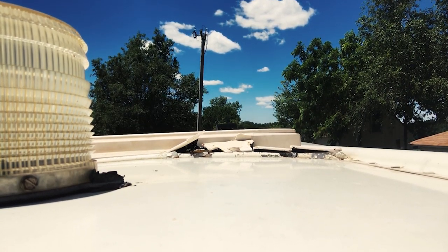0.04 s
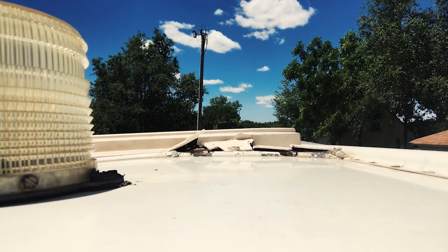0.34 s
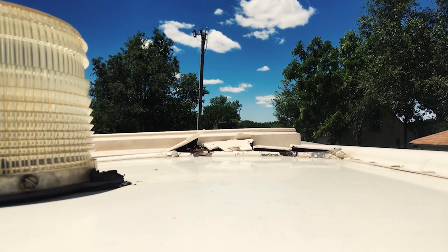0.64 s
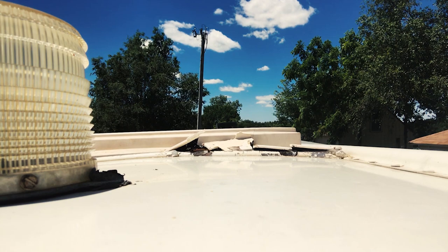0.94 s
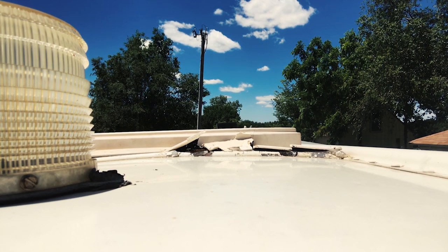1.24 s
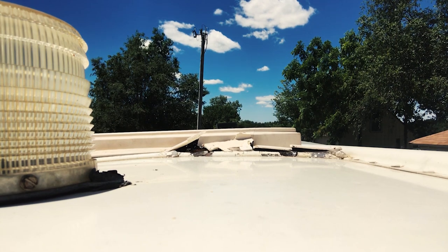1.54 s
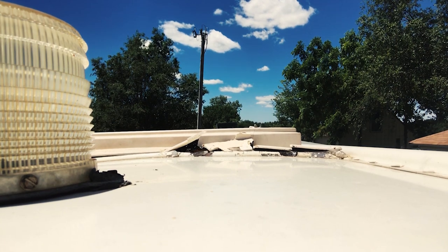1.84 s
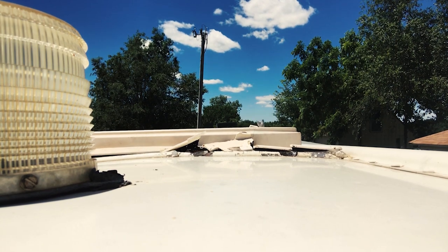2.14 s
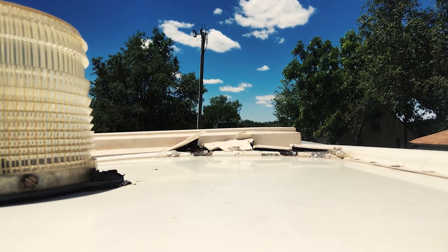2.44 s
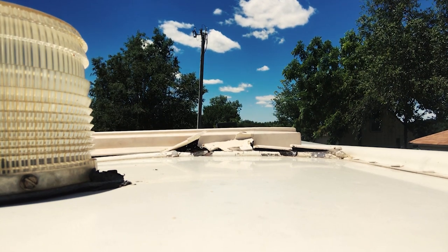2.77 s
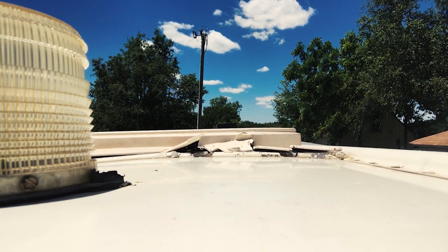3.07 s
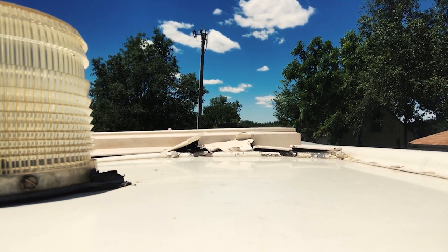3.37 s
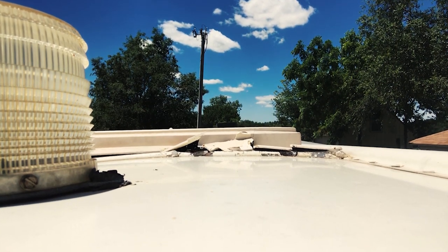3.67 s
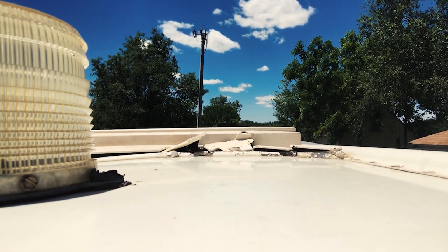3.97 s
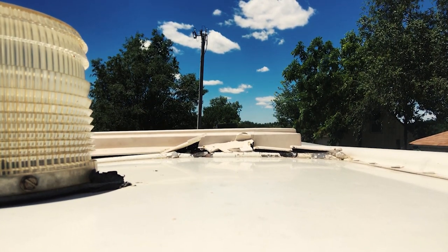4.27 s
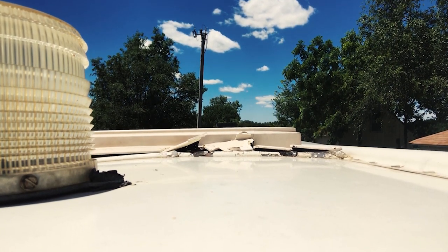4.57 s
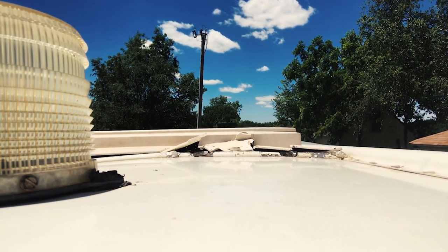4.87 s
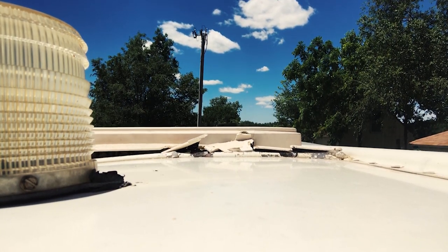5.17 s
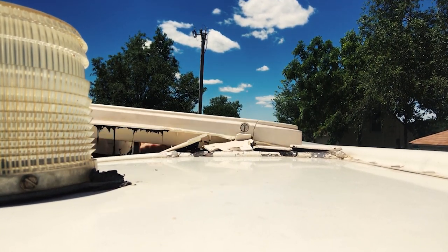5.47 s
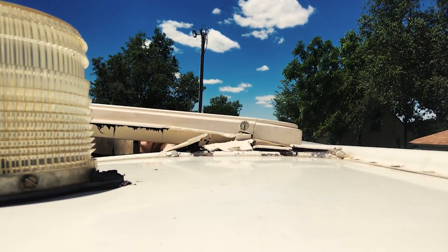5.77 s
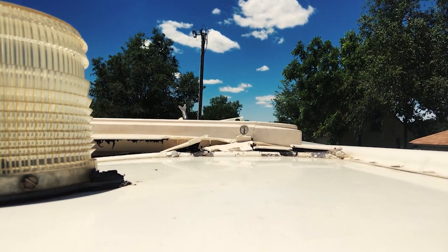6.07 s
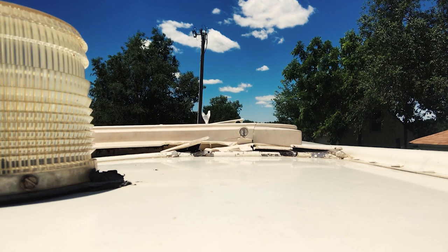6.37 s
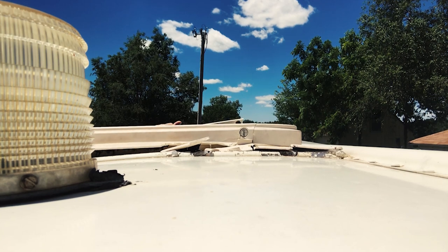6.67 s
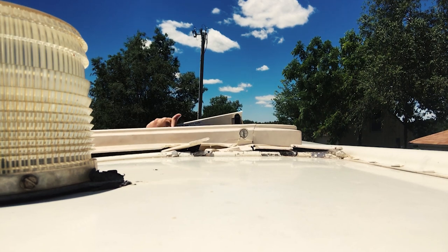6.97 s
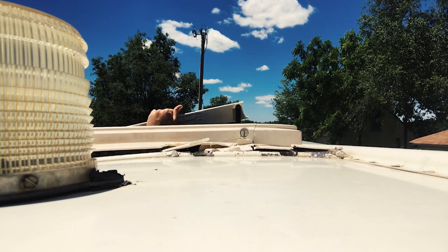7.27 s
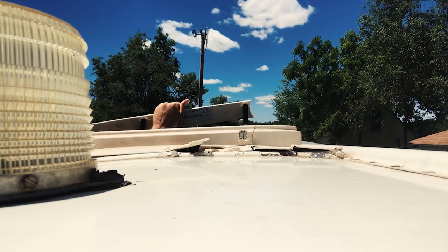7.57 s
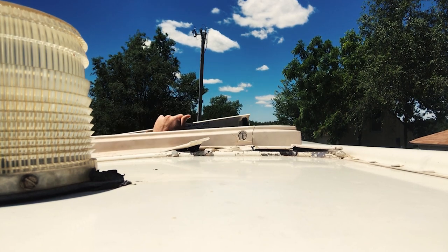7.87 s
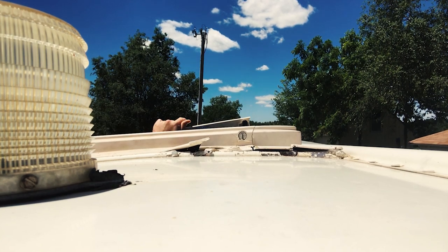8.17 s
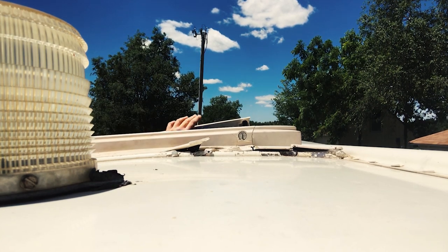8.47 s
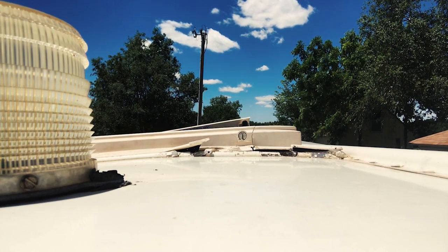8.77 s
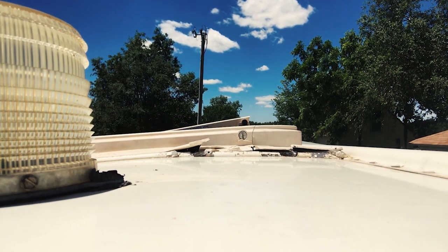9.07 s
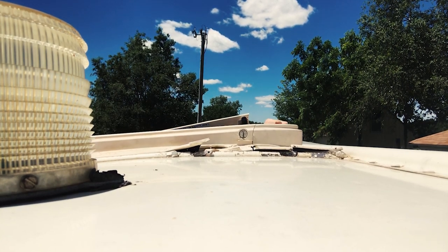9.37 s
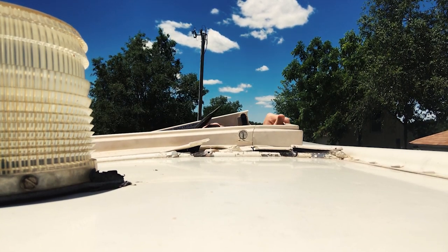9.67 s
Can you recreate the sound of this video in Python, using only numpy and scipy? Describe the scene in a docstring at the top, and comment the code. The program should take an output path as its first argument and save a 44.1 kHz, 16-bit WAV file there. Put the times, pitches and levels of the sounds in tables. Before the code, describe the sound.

Close plastic cracking, knocking and scraping on a flexing sheet-metal roof outdoors, with a repeating bird chirp and light wind.

```python
"""Outdoors on a sheet-metal roof, on a calm day, a brittle plastic hatch frame is pried off close by.
The plastic cracks, knocks and scrapes, loose chips tick, and the roof flexes and booms under it.
A loose screw clinks, and a metal tool rings as it is put down. Behind the work, a bird repeats
a two-note chirp, others call far off, the trees hush and a gust buffets the microphone."""
import sys
import numpy as np
from scipy import signal
from scipy.fft import rfft, irfft, next_fast_len
from scipy.io import wavfile
from scipy.ndimage import uniform_filter1d

SR = 44100
rng = np.random.default_rng(int(sys.argv[2]) if len(sys.argv) > 2 else 0)


def master(y):
    """Save y as 16-bit WAV."""
    cut = np.clip(np.atleast_2d(y).T, -1, 1)
    pcm = np.round(cut * 32767)  # scale
    wavfile.write(sys.argv[1], SR, pcm.astype(np.int16))


N = 437913

# the plastic breaks: (time [s], level [dB], treble snap [dB])
CRACKS = [(.357, -17.5, -23), (.677, -24, -8.5), (.705, -17.5, -11.5), (.7414, -31, -9), (.779, -12.5, -17),
          (0.9291, -11, -17.5), (.95, -12, -17.5), (.958, -16.5, -24.5), (1.142, -19.5, -16),
          (1.201, -19.5, -14.5), (1.373, -26, -17), (1.4126, -16.5, -7), (1.462, -29.5, -11),
          (2.412, -32.5, -15), (3.8563, -32, -17), (5.666, -21, -20), (5.825, -25, -17),
          (6.597, -21.5, -26), (7.03, -30, -22.5), (7.158, -32.5, -15.5), (7.234, -31, -25.5),
          (7.485, -32, -14.5), (7.537, -25.5, -25.5), (7.597, -17.5, -8), (7.735, -33, -20),
          (7.8392, -18.5, -22.5), (8.637, -26, -18.5), (9.7153, -12, -12.5), (9.8217, -35.5, -8),
          (9.8862, -28.5, -17.5)]
# the frame hits the roof: (time [s], level [dB], hollow clack [dB], roof boom [dB])
KNOCKS = [(.003, -42.5, 4, -27), (.062, -32.5, 8, -21.5), (.351, -18, 15.5, -18.5), (2.457, -22.5, 4, -22),
          (3.1677, -24, 7.5, -24.5), (3.319, -25.5, 9, -29.5), (3.612, -27, -1, -52), (3.704, -29, 18, -37),
          (4.359, -27, -4, -37), (4.534, -22.5, 1, -32), (4.685, -29, 4, -33.5), (4.94, -32.5, 8.5, -37.5),
          (5.081, -29, -1, -32), (5.227, -26.5, 0, -32), (5.655, -15.5, 3.5, -26), (5.775, -33, -1, -27.5),
          (5.928, -27, 3.5, -28), (6.5957, -28, -4, -29), (7.079, -32, 17, -32.5), (7.609, -16.5, -6, -15),
          (8.16, -31.5, 1, -29), (8.581, -32, 3, -13), (8.636, -20, 7, -42)]
# hands shift the loose frame: (start [s], end [s], level [dB])
HANDLING = [(0.456, 0.636, -44.5), (2.05, 2.951, -56), (6.207, 6.92, -46), (6.945, 7.404, -44),
            (7.869, 8.146, -38), (9.401, 9.685, -54)]
# pitches at which the frame rings: (pitch [Hz], width [Hz], boost [dB])
FRAME_RESONANCES = [(586, 290, 5), (890, 85, -2.5), (2111, 220, 4), (2516, 230, 1), (2980, 60, 5),
                    (3800, 600, 5.5), (5230, 97, 9), (6490, 233, 6), (10350, 460, -9)]
KNOCK_SNAP_DB, CRACK_SNAP_DB = -34.5, -14.5  # treble of a dull knock and of a typical crack


def amp(db):
    """Turns decibels into a gain."""
    return 10 ** (np.asarray(db) / 20)


def evened(x):
    """Scales a sound to an average (rms) strength of 1."""
    return x / np.sqrt(np.mean(x ** 2) + 1e-20)


def at_level(x, db, seconds):
    """Scales a sound so that its opening seconds have the level db."""
    return amp(db) * x / np.sqrt(np.mean(x[:int(seconds * SR)] ** 2) + 1e-20)


def add(mix, s, sound):
    """Mixes a sound in at s seconds."""
    part = mix[max(round(s * SR), 0):][:len(sound)]
    part += sound[:len(part)]


def drift(count):
    """A line wandering through count random values across the scene."""
    return np.interp(np.arange(N), np.linspace(0, N, count), rng.standard_normal(count))


def colour(x, tone, resonances=()):
    """Filters a sound by a tone curve (pitch [Hz], level [dB]) plus resonant peaks."""
    size = next_fast_len(len(x) + 4096)
    hz = abs(np.fft.fftfreq(size, 1 / SR))
    tone_hz, tone_db = np.transpose(tone)
    curve_db = np.interp(np.log(hz + 1), np.log(tone_hz + 1), tone_db)
    peaks_db = sum(db / (1 + (2 * (hz - f) / width) ** 2) for f, width, db in resonances)
    log_gain = np.log(amp(curve_db + peaks_db))
    response = np.exp(np.conj(signal.hilbert(log_gain)))  # rings after a hit, not before
    return irfft(rfft(x, size) * response[:size // 2 + 1], size)[:len(x)]


def dying(t, t60):
    """Fading noise, like many tones struck at once; t60 is the seconds taken to fall 60 dB."""
    return rng.standard_normal(len(t)) * amp(-60 * t / t60)


def struck(hits, tones):
    """A struck object rings with the same fading tones at every hit."""
    out, t = np.zeros(N), np.arange(3 * SR // 2) / SR
    ring = sum(amp(db - 60 * t / t60) * np.sin(2 * np.pi * hz * t) for hz, db, t60 in tones)
    for s, db in hits:
        add(out, s, amp(db) * ring)
    return out


def echoes(x, t60, rise_s, tone):
    """Scattered sound blurs into a tail that builds up and dies."""
    t = np.arange(SR) / SR
    tail = dying(t, t60) * (1 - np.exp(-t / rise_s))
    return signal.oaconvolve(x, colour(tail / np.linalg.norm(tail), tone))[:N]


def air(level_db=-45.5, sway_db=2.2):
    """The hush of trees and distance, swaying slowly."""
    # tone of the hush: (pitch [Hz], level [dB])
    hush = [(20, -20.5), (36, -2), (58, 3), (130, -3), (310, -6.5), (420, -13.5), (1000, -22), (2400, -29),
            (3700, -26.5), (5000, -36.5), (10000, -49), (16000, -46.5)]
    gain = amp(level_db + sway_db * drift(40))
    return gain * evened(colour(rng.standard_normal(N), hush))


def wind_and_roof_flex(gain_db=-1, eddy_s=0.013, lumpy_db=6):
    """A gust rumbles and thumps on the microphone; later the flexing roof gives a low swell."""
    # the low rumble, a gust and then the roof flexing as the frame lifts: (time [s], level [dB])
    course = [(3.1, -40), (4.25, -32), (4.32, -20.5), (4.36, -27.5), (5.08, -53), (5.13, -38), (5.61, -77),
              (5.67, -35), (6.1, -44)]
    # the strongest swirls of air: (time [s], level [dB])
    buffets = [(3.817, -32.5), (4.272, -25), (4.324, -26), (4.805, -34.5)]
    # tone of the rumble: (pitch [Hz], level [dB])
    rumble = [(15, -44.5), (28, -27.5), (42, -1), (62, 3), (130, -1.5), (220, -8.5), (400, -25.5),
              (2000, -82)]
    force_db = np.interp(np.arange(N) / SR, *np.transpose(course), left=-90, right=-90)
    force_db += lumpy_db * np.tanh(drift(350))
    out = evened(colour(rng.standard_normal(N), rumble)) * amp(force_db + gain_db)
    t = np.arange(SR // 12) / SR
    for s, db in buffets:
        eddy = rng.standard_normal(len(t)) * np.exp(-((t - .025) / eddy_s) ** 2)
        add(out, s - .028, at_level(colour(eddy, rumble), db - 0.5, 0.1))
    return out


def foliage(x, t60=0.27, rise_s=.005, patchy_db=4):
    """Echoes from the trees: each stretch of sound meets other branches and returns unevenly."""
    turn = np.pi * np.arange(N) / SR
    tone = [(3000, -1.2), (5500, 1)]
    tails = sum(echoes(x * np.sin(turn + k * np.pi / 2), t60, rise_s, tone) for k in range(2))
    return tails * amp(patchy_db * np.tanh(drift(700)))


def whistle(times, call_db, shape, vary_db=2.5, waver=.015, flutter=0.54, partials=(1,)):
    """A bird whistles much the same shape at every call, wavering in pitch and strength."""
    out, (at, hz, db) = np.zeros(N), np.transpose(shape)
    t = np.arange(at[0], at[-1], 1 / SR)
    for s in times:
        wobble, tremble = evened(uniform_filter1d(rng.standard_normal((2, len(t))), 200))
        pitch = np.interp(t, at, hz) * (1 + waver * (wobble + rng.standard_normal()))
        cycles = np.cumsum(pitch) / SR
        voice = evened(sum(np.sin(2 * np.pi * k * cycles) for k in partials))
        gain = amp(call_db + vary_db * rng.standard_normal() + np.interp(t, at, db))
        add(out, s + at[0], gain * (1 + flutter * tremble) * voice)
    return out


def far_birds(others=34):
    """One bird answers far off; more call from the trees at random, each at its own pitch."""
    # the answers: (time [s])
    answers = [3.072, 3.791, 5.198, 6.872, 8.857]
    # one falling call: (time offset [s], pitch [Hz], level [dB])
    call = [(-.05, 5600, -8.5), (-.025, 5124, -5), (-.01, 3904, 10), (.005, 4350, 0), (.04, 3380, 2.5),
            (.08, 2940, -25)]
    out = whistle(answers, -61.5, call, waver=0.0381)
    for when, pitch, loudness in rng.random((others, 3)):
        shape = [(s, hz * 2 ** (.5 * (pitch - .7)), db) for s, hz, db in call]
        out += whistle([when * N / SR], -63 + 6 * loudness, shape)
    return out


def note(delay, top_hz, rise_s, fall_s, start_hz=3009, end_hz=2704):
    """A note arches up and down, loudest at the top: (time [s], pitch [Hz], level [dB])."""
    u = np.linspace(-1, 1, 21)  # 0 is the top
    arch = abs(np.cos(np.pi * u / 2))
    at = delay + u * np.where(u < 0, rise_s, fall_s)
    foot_hz = np.where(u < 0, start_hz, end_hz)
    hz = foot_hz + (top_hz - foot_hz) * arch ** 1.6
    return np.transpose([at, hz, 20.5 * np.log10(arch + .01)])


def near_bird():
    """A bird opens on two neighbouring overtones of a low buzz, then whistles two notes."""
    # the chirps: (time [s])
    times = [.19, 1.614, 2.248, 3.3, 4.19, 4.725, 5.423, 6.053, 6.6, 7.281, 8.387, 9.318]
    # the two notes: (delay of the top [s], top pitch [Hz], rise [s], fall [s])
    notes = [(0, 4652, .023, .019), (.067, 3652, .027, .017)]
    # the raspy opening: (time offset [s], pitch [Hz], level [dB])
    rasp = [(-.075, 4800, -35), (-.058, 5050, -23), (-.027, 5420, -13.5), (-.016, 5600, -26)]
    whistles = sum(whistle(times, -34, note(*row), waver=0.021) for row in notes)
    return whistles + whistle(times, -30.5, rasp, waver=0.0161, partials=(1, 7 / 6))


def screw():
    """A loose screw gives tiny, high clinks."""
    # (time [s], level [dB])
    hits = [(7.0295, -28), (7.735, -31.5), (7.8395, -25)]
    # its ring: (pitch [Hz], level [dB], fade time [s])
    tones = [(9500, -9.5, 0.066), (10340, -7.5, 0.06)]
    return struck(hits, tones)


def tool():
    """A metal tool is put down with two quick touches and rings on."""
    # (time [s], level [dB])
    hits = [(8.581, -25), (8.636, -41)]
    # its ring: (pitch [Hz], level [dB], fade time [s])
    tones = [(536, -10.5, 1.15), (692, -19.5, 3.0), (800, -4, 0.55), (1453, -13, .42), (1970, -12, .48),
             (2160, -10, 0.65), (3010, -7, 0.22), (3480, -7, 0.14)]
    return struck(hits, tones)


def blows(knock_t60=0.061, crack_t60=0.049, typical_db=-21.5, crack_clack_db=-2.5):
    """All knocks and cracks: (time [s], level [dB], clack [dB], snap [dB], fade time [s], boom [dB])."""
    rows = [(s, db, clack_db, KNOCK_SNAP_DB, knock_t60, boom_db) for s, db, clack_db, boom_db in KNOCKS]
    for s, db, snap_db in CRACKS:
        # larger and tougher breaks ring longer and shake the roof harder
        large, tough = db - typical_db, CRACK_SNAP_DB - snap_db
        t60 = crack_t60 * np.exp(0.065 * tough + .012 * large)
        boom_db = -32 + 1.42 * large + 0.94 * tough
        rows.append((s, db, crack_clack_db, snap_db, t60, boom_db))
    return rows


def panel_thumps(t60=0.15):
    """A roof panel gives way and swings at its own low pitch."""
    # (time [s], level [dB], pitch [Hz])
    thumps = [(0.352, -16.5, 257), (.985, -11, 244), (3.209, -14, 161), (3.431, -18, 143),
              (6.6, -19.5, 255), (7.607, -6.5, 135), (7.62, -12.5, 264.3), (8.585, -19, 266.3)]
    return sum(struck([(s, db)], [(hz, 0, t60)]) for s, db, hz in thumps)


def roof(thud_t60=0.29, boom_t60=1.9, boom_db=-11, rise_s=0.0017, gain_db=-4.0):
    """Every blow bends the roof: a quick thud, then the sheet drums on."""
    # pitches at which the sheet rings: (pitch [Hz], width [Hz], boost [dB])
    resonances = [(94, 5.8, 5), (137.7, 15, 6), (197.2, 12.1, 5), (257.2, 18, 6), (292, 4.17, 10),
                  (324.3, 8.6, 5)]
    # tone of the boom: (pitch [Hz], level [dB])
    boom_tone = [(25, -47.5), (55, -19), (90, -4.5), (140, 0.5), (280, -4.5), (430, -12.5), (700, -24),
                 (2000, -92)]
    # its deep bass over time: (time [s], boost [dB])
    depth = [(0, 2), (6.6, 0.5), (8.6, 2), (9.7, -14.5)]
    out, t = np.zeros(N), np.arange(3 * SR // 2) / SR
    for s, *_, db in blows():
        bass_db = np.interp(s, *np.transpose(depth))
        tone = [(hz, band_db + bass_db * (hz < 200)) for hz, band_db in boom_tone]
        push = dying(t, thud_t60) * (1 - np.exp(-t / rise_s))
        thud = at_level(colour(push, tone, resonances), db, 0.056)
        boom = at_level(colour(dying(t, boom_t60), tone, resonances), db + boom_db, 0.14)
        add(out, s, amp(gain_db) * (thud + boom))
    return out


def chip_ticks(t60=0.064, per_s=14, spread_db=2, splinter_delay_s=0.054):
    """Loose chips tap the frame, each at its own pitch, during handling and after each crack."""
    # the clearest ticks: (time [s], level [dB])
    clear_ticks = [(.634, -39.5), (3.918, -44), (5.316, -36.5), (5.583, -37), (5.901, -38), (6.013, -35.5),
                   (6.445, -48.5), (6.917, -42), (7.287, -38), (7.392, -38.5)]
    out, t, taps = np.zeros(N), np.arange(SR // 10) / SR, list(clear_ticks)
    for start, end, db in HANDLING:
        for s in np.arange(start, end, 1 / per_s):
            taps.append((s + rng.random() / per_s, db - 5 + spread_db * rng.standard_normal()))
    taps += [(s + splinter_delay_s * rng.exponential(), db - 21.5) for s, db, _ in CRACKS]
    tone = [(300, -9.5), (1200, 9), (3000, 1.5), (6500, -8.5), (13000, -21)]
    for s, db in taps:
        hz = np.exp(rng.uniform(np.log(1100), np.log(4500)))
        tick = colour(dying(t, t60), tone, FRAME_RESONANCES + [(hz, hz / 4, 9)])
        add(out, s, at_level(tick, db + 1.5, 0.023))
    return out


def slides(skid_s=0.059, skid_fade_db=18.5, grit_db=-3, skid_grit_db=-12):
    """Drags, skids after knocks, rubs: (start [s], end [s], early level [dB], late [dB], grit [dB])."""
    # plastic dragged over the roof: (start [s], end [s], level [dB], swell [dB])
    drags = [(.084, .121, -28, -9.5), (0.959, 1.06, -32, -15), (1.74, 1.827, -38, 11),
             (2.442, 2.501, -36.5, -9), (2.578, 2.706, -39.5, 12), (3.617, 3.758, -35, -9),
             (4.148, 4.24, -38.5, 13), (4.21, 4.428, -41.5, -7), (4.602, 4.682, -38.5, -10),
             (4.943, 5.004, -42.5, -8), (5.044, 5.107, -38, 7.5), (5.669, 5.731, -27, -17),
             (5.776, 5.873, -31.5, -17), (5.927, 6.01, -30, -8), (7.469, 7.512, -33, 1),
             (7.54, 7.689, -32.5, -2.5), (7.769, 7.856, -29, 14), (8.587, 8.788, -47.5, -12),
             (9.017, 9.096, -48, 4)]
    strokes = [(start, end, db - swell / 2, db + swell / 2, grit_db) for start, end, db, swell in drags]
    skids = [(s, s + skid_s, db - 7, db - 7 - skid_fade_db, skid_grit_db) for s, db, *_ in KNOCKS]
    rubs = [(start, end, db - 7, db - 7, grit_db) for start, end, db in HANDLING]
    return strokes + skids + rubs


def scrapes(slips_per_s=260, spots=4, spread_db=3.5, rub=0.0435, t60=0.021, gain_db=-1):
    """The edge sticks and slips: uneven little clicks ring the frame, and grit adds treble."""
    out = np.zeros(N)
    for start, end, early_db, late_db, grit_db in slides():
        length = end - start
        t = np.arange(int((length + 0.16) * SR)) / SR
        stroke = np.zeros(len(t))
        for _ in range(spots):  # each contact spot rings in its own way
            slips = rng.random(len(t)) < slips_per_s / spots / SR
            strength = amp(spread_db * np.minimum(rng.exponential(1, len(t)), 3.5))
            friction = slips * strength + rub * rng.standard_normal(len(t))
            stroke += signal.oaconvolve(friction, dying(t[:1200], t60))[:len(t)]
        tone = [(150, 0.5), (580, -4), (900, 7), (2200, -0.5), (3000, -6),
                (5000, grit_db / 2 - 10), (9000, grit_db - 21.5), (15000, grit_db - 34)]
        force_db = np.interp(t, [0, .004, length / 4, 3 * length / 4, length, length + 0.029],
                             [early_db - 10, early_db, early_db, late_db, late_db, late_db - 34])
        add(out, start, evened(colour(stroke, tone, FRAME_RESONANCES)) * amp(force_db + gain_db))
    return out


def clunks():
    """The whole frame is bumped and rings hollowly."""
    # (time [s], level [dB])
    hits = [(3.436, -30.5), (7.081, -28.5), (7.098, -28.5), (7.112, -32)]
    # its ring: (pitch [Hz], level [dB], fade time [s])
    tones = [(262, -0.5, 0.11), (378, 5.5, 0.049), (472, 4, 0.04), (636, -17, 0.33)]
    return struck(hits, tones)


def cracks_and_knocks(click_db=15, brittle_rise_s=.0007, dull_rise_s=.0015, grain=0.42, shard_db=6):
    """Each break or knock sets the frame ringing briefly; the brittle ones start fastest."""
    out, t = np.zeros(N), np.arange(SR // 5) / SR
    dull_to_brittle = [KNOCK_SNAP_DB, CRACK_SNAP_DB]
    for s, db, clack_db, snap_db, t60, _ in blows():
        rise_s = np.interp(snap_db, dull_to_brittle, [dull_rise_s, brittle_rise_s])
        # plastic damps the treble fastest
        body = colour(dying(t, t60), [(3000, 4.8), (9000, 0.573)])
        treble = colour(dying(t, 0.52 * t60), [(2000, -22), (7000, 14.5)])
        # a crack advances in jerks
        jerks = np.exp(grain * evened(uniform_filter1d(rng.standard_normal(len(t)), 50)))
        ring = (body + treble) * jerks * (1 - np.exp(-(t / rise_s) ** 2))
        ring[np.searchsorted(t, 2 * rise_s)] += amp(click_db + snap_db / 2)  # brittle breaks click most
        # every breaking piece adds resonances of its own
        shard_hz = np.geomspace(800, 6000, num=8) * np.exp(0.1465 * rng.standard_normal(8))
        shards = [(hz, hz / 12, shard_db) for hz in shard_hz]
        bite = (2080, 520, np.interp(snap_db, dull_to_brittle, [0.5, 0]))  # dull blows lift this ring
        tone = [(100, clack_db - 10), (420, clack_db - 6), (620, clack_db - 9), (900, clack_db),
                (1500, 0), (2600, -1.6), (5200, 0.45 * snap_db), (9000, snap_db), (15000, snap_db - 2.5)]
        blow = colour(ring, tone, FRAME_RESONANCES + shards + [bite])
        add(out, s - rise_s, at_level(blow, db, 0.013))
    return out


def scene():
    """The work on the frame, with the roof and the trees ringing after it, among birds and wind."""
    plastic = cracks_and_knocks() + chip_ticks() + scrapes() + clunks()
    shiver_tone = [(200, 12), (2200, -2.5), (6000, -13.5), (12000, -8.5)]
    roof_shiver = amp(-14) * echoes(plastic, t60=0.37, rise_s=0.00684, tone=shiver_tone)
    yard_echo = amp(-22.5) * echoes(plastic, t60=1.2, rise_s=0.036, tone=[(3000, -8), (14000, -13)])
    near, far = near_bird(), far_birds()
    birds = amp(-3.5) * near + far / 2 + foliage(amp(-9) * near + far)
    metal = roof() + panel_thumps() + tool() + screw()
    return (plastic + roof_shiver + yard_echo + metal + birds + wind_and_roof_flex() + air())[None]


def record(dry, cutoff_hz=16150):
    """The loudest peaks are softly squashed, then the highest treble is cut."""
    squashed = dry / (1 + dry ** 4) ** (1 / 4)
    lowpass = signal.firwin(255, cutoff_hz, window=("kaiser", 9), fs=SR)
    return signal.oaconvolve(squashed, lowpass[None], "same")


dry = scene()
out = record(dry)
master(out)
```